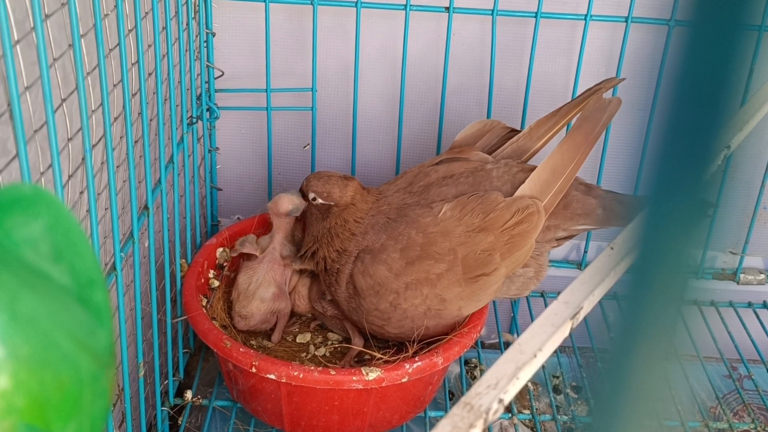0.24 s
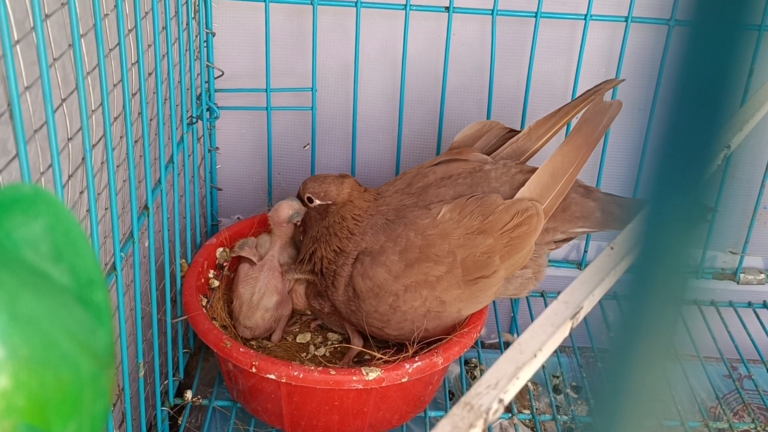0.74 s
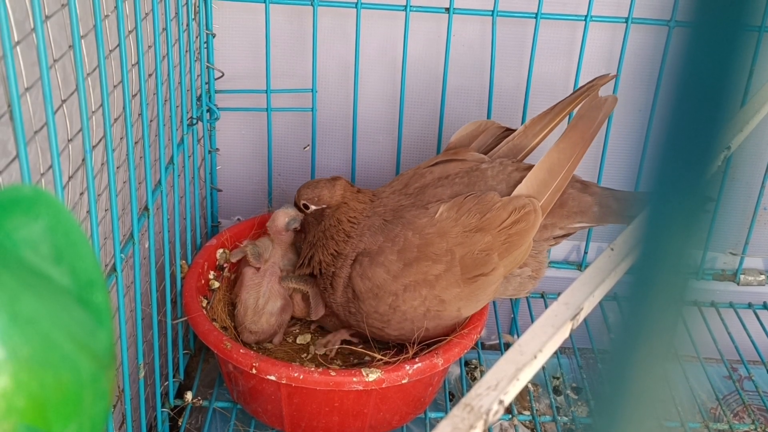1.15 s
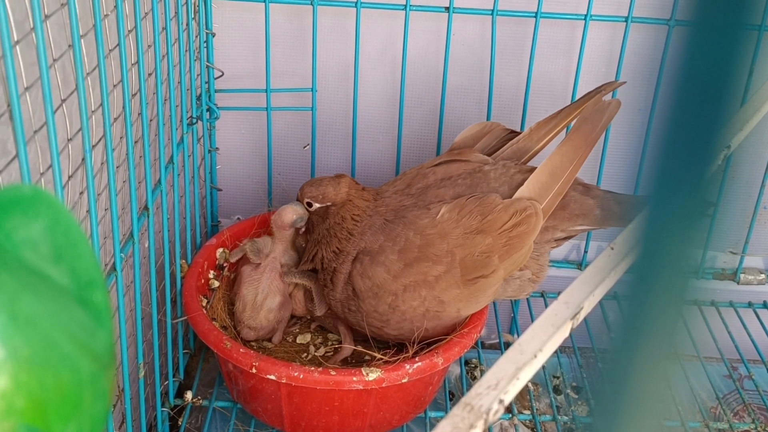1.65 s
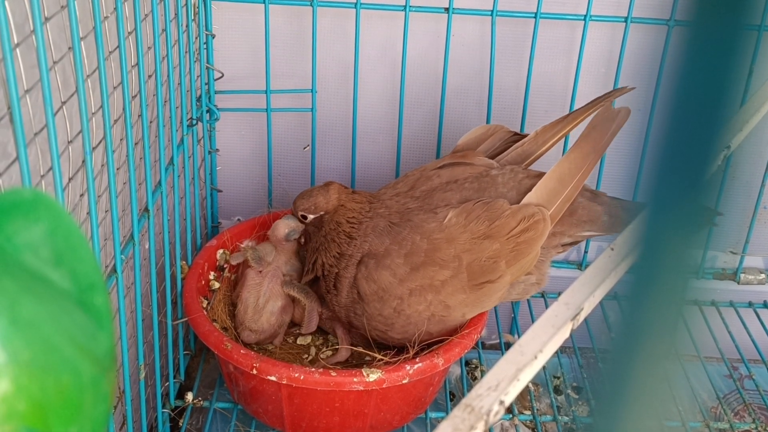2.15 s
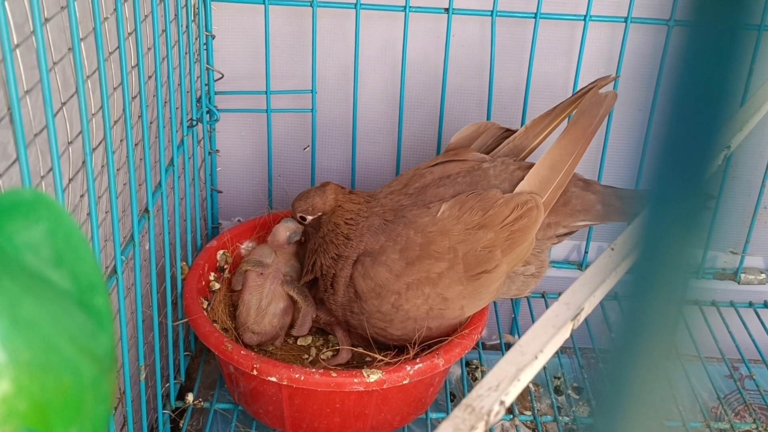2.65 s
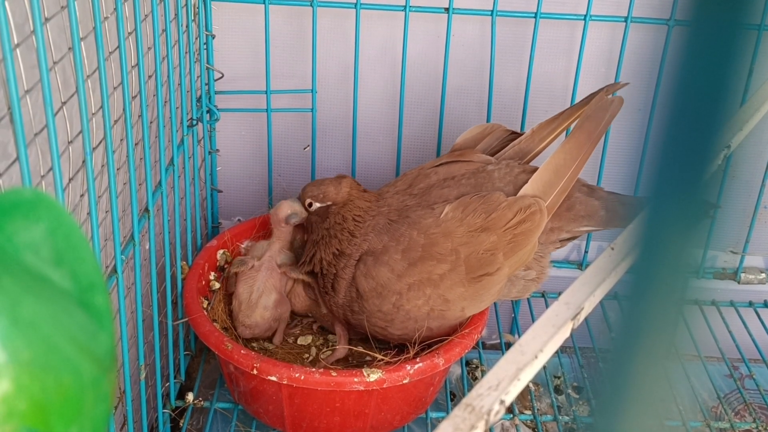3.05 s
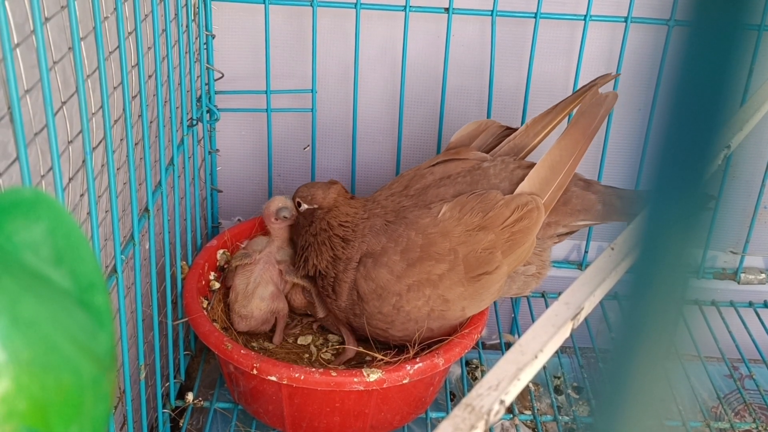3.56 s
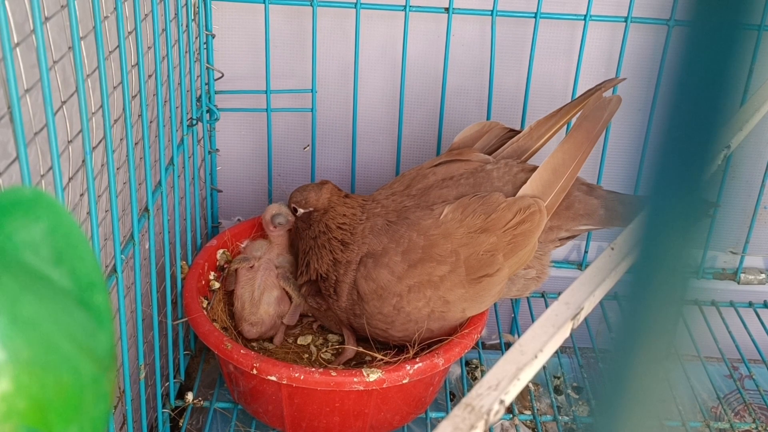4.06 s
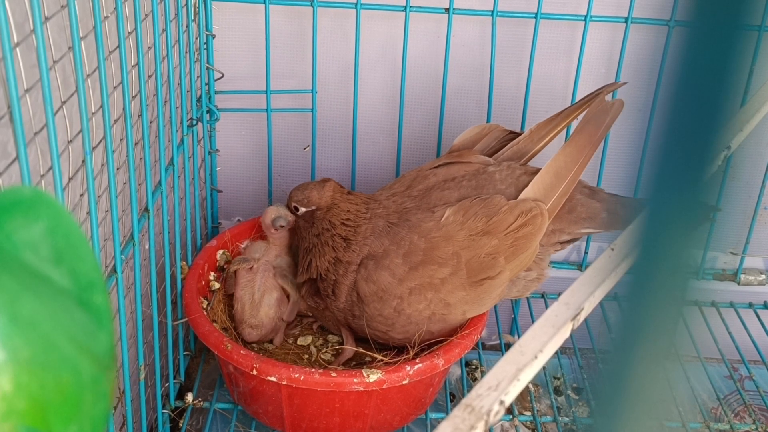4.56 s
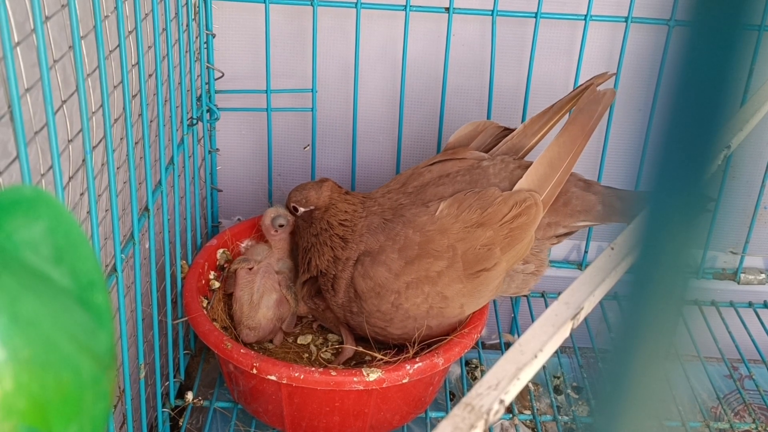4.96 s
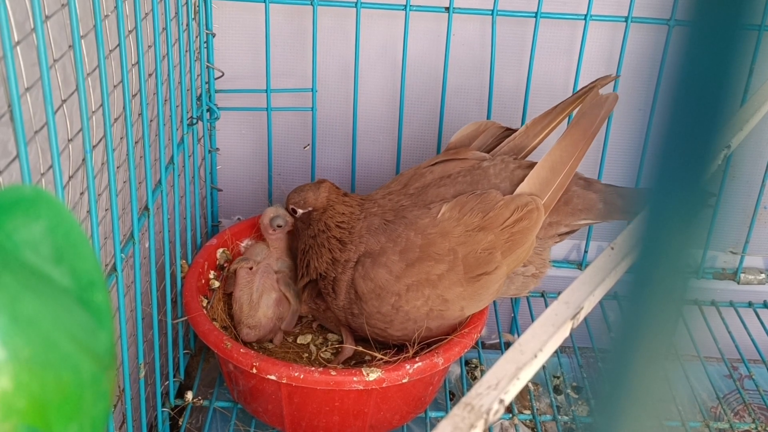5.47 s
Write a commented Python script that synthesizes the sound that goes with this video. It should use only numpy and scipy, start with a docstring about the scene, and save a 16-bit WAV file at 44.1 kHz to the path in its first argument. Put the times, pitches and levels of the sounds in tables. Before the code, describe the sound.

A fan throbs low in a small room while a baby bird peeps, squeals and rasps, then wings flurry against a plastic bowl.

```python
"""Throughout, a fan throbs in a small room: orders of its turning rate over rumble and rushing air.
Early on a young bird peeps in thin two-voiced arches (paired sine sweeps), and feathers rustle (grainy noise).
A squab being fed squeals, then squeaks (gliding tones) and rasps (noise through throat resonances) in bouts.
Faint peeps that only rise come midway, ahead of the second bout. Near the end a flurry of the parent's
wing beats pushes air, scuffs the nest and rings the plastic bowl; brushes and clicks follow."""
import sys
import numpy as np
from scipy import signal
from scipy.fft import rfft, irfft
from scipy.io import wavfile

SR = 44100
rng = np.random.default_rng(int(sys.argv[2]) if len(sys.argv) > 2 else 0)


def transcribe(u):
    """Save the signal u as a 16-bit wav file named by the first command-line argument.

    u: samples, shape (n,) or (channels, n), limited to [-1, 1]; the rate is SR.
    q: integer samples, one column per channel.
    """
    v = np.clip(np.atleast_2d(u).T, -1, 1)
    q = np.round(v * 32767).astype(np.int16)
    wavfile.write(sys.argv[1], SR, q)


N = 252252
TIME = np.arange(N) / SR

# wing beats: t/s, relative knock/dB, strongest bowl pitch f/Hz, scuff level/dB, air push level/dB
BEATS = [(4.67, -37.5, 348, -70, -63), (4.717, -24.5, 348, -38, -54), (4.792, -25, 255, -47.5, -43),
         (4.836, -24, 355, -41, -38), (4.895, -30.5, 306, -76, -38), (4.954, -27, 362, -32, -54),
         (5.044, -27, 345, -43.5, -30.5), (5.063, -23, 344, -47, -45), (5.113, -27, 356, -30.5, -23.5),
         (5.138, -11, 443, -33, -31), (5.217, -25.5, 405, -42.5, -28), (5.251, -26, 312, -46.5, -49),
         (5.303, -24.5, 430, -38.5, -28.5), (5.337, -33.5, 284, -57, -39), (5.402, -30, 350, -41, -27.5),
         (5.47, -38, 308, -45.5, -38)]


def from_db(db):
    """Amplitude gain of a level in dB."""
    return 10 ** (np.asarray(db) / 20)


def rms_one(x):
    """Scale to unit RMS."""
    return x / np.sqrt(np.mean(x ** 2) + 1e-20)


def pan(db):
    """Left and right gains for a left-minus-right difference."""
    return from_db([[db / 2], [-db / 2]])


def level(t_s, db):
    """A dB curve as a gain, -150 dB outside its span."""
    return from_db(np.interp(TIME, t_s, db, left=-150, right=-150))


def at_hz(points):
    """A spectrum table interpolated over log frequency at every FFT bin."""
    hz, value = np.transpose(points)
    bins_hz = np.arange(N // 2 + 1) * SR / N
    return np.interp(np.log(bins_hz + 1), np.log(hz), value)


def drift(rate_hz):
    """Smooth unit-RMS random curve with two knots per period of the rate."""
    knots = rng.standard_normal(N)
    return rms_one(np.interp(TIME * 2 * rate_hz, np.arange(N), knots))


def noise(spectrum):
    """Unit-RMS coloured stereo noise, alike in the bass and diffuse in the treble."""
    # left-right correlation: f/Hz, correlation/1
    likeness = [(30, 0.98), (120, 0.96), (250, 0.59), (500, 0.68), (1000, 0.029), (2500, -0.29),
                (6000, 0.13)]
    mid, side = rfft(rng.standard_normal((2, N)))
    alike = np.clip(at_hz(likeness), -1, 1)
    stereo = np.sqrt(1 + alike) * mid + np.sqrt(1 - alike) * side * [[1], [-1]]
    return rms_one(irfft(from_db(at_hz(spectrum)) * stereo, N))


def band(x, low_hz, high_hz, order=2):
    """Butterworth band-pass."""
    sos = signal.butter(order, [low_hz, min(high_hz, .45 * SR)], "band", fs=SR, output="sos")
    return signal.sosfilt(sos, x + 1e-18)


def swell(peak_s, rise_s, fall_s):
    """Bell-shaped gain; rise and fall are its 1/e half-widths."""
    out = np.zeros(N)
    on = slice(*np.searchsorted(TIME, [peak_s - 5 * rise_s, peak_s + 5 * fall_s]))
    offset = TIME[on] - peak_s
    out[on] = np.exp(-(offset / np.where(offset < 0, rise_s, fall_s)) ** 2)
    return out


def room(x, wet_db, t60_s):
    """Direct sound plus dense, dying reflections off near walls."""
    t = TIME[:SR // 2]
    echoes = rng.standard_normal((2, len(t))) * from_db(-60 * t / t60_s) * (t > .002)
    echoes /= np.sqrt(np.sum(echoes ** 2, axis=1, keepdims=True))
    wet = from_db(wet_db)
    reflected = signal.fftconvolve(np.atleast_2d(x), echoes, axes=1)[:, :N]
    return (x + wet * reflected) / np.sqrt(1 + wet ** 2)


def delay(x, lag_s):
    """Shift a signal later by a fractional number of samples."""
    return np.interp(TIME - lag_s, TIME, x, left=0)


def walls(x, lag_s):
    """A voice reaches the right ear first, then returns off the nearest walls."""
    # wall paths: left ear delay/s, right ear delay/s, level/dB
    wall_paths = [(.0031, 0.0033, -7.5), (.0074, .0066, -13.5), (0.0121, .0139, -18)]
    out = np.array([delay(x, lag_s), x])
    for left_s, right_s, db in wall_paths:
        out += from_db(db) * np.array([delay(x, left_s), delay(x, right_s)])
    return out


def ring(force, hz, t60_s):
    """Two-pole resonator: a unit click sets a decaying sine of initial height 1 ringing."""
    r, w = from_db(-60 / (t60_s * SR)), 2 * np.pi * hz / SR
    return signal.lfilter([0, np.sin(w)], [1, -2 * r * np.cos(w), r * r], force + 1e-18)


def fan():
    """Three unequal blades give a throb that repeats every turn, over rumble and rushing air."""
    # strong low orders: multiple of the turning rate/1, relative level/dB
    orders = [(3, 2.5), (4, -12.5), (6, -0.5), (8, -10), (9, -5.5), (12, -12.5), (15, -14)]
    # low noise: f/Hz, density/dB
    rumble = [(20, -29), (40, -15.5), (55, 13), (70, 5), (100, -2.5), (160, -2), (220, -10), (290, -9.5),
              (350, -17.5), (420, -28), (700, -74)]
    # rushing air: f/Hz, density/dB
    air = [(200, -3), (500, 2.5), (1000, -1.5), (2000, -4.5), (3300, -2.5), (3800, -12), (4400, -24),
           (7000, -32), (11500, -38.5), (13000, -23.5), (15000, -28.5)]
    turns_hz, crest_s = 12.828, 2.036  # orders up to 12 crest together at crest_s
    high_db, slope_db_per_octave, blade_db = -22.5, -9, 6.5
    tone_db, rumble_db, air_db = -39, -42, -60.5
    levels_db = {}
    for k in range(13, 28):
        # multiples of the blade rate stand out
        levels_db[k] = high_db + slope_db_per_octave * np.log2(k / 13) + blade_db * (k % 3 == 0)
    levels_db.update(orders)
    turn, throb = 2 * np.pi * turns_hz * (TIME - crest_s), 0
    for k, db in levels_db.items():
        scatter = rng.uniform(-np.pi, np.pi) * (k > 12)  # the room scrambles the high orders
        throb = throb + from_db(db) * np.cos(k * turn + scatter)
    low = from_db(tone_db) * throb + from_db(rumble_db) * noise(rumble)
    return pan(2.86) * low + pan(-3.5) * from_db(air_db) * noise(air)


def effort():
    """How hard the parent struggles during the wing flurry, as a gain."""
    # struggle: t/s, effort/dB
    struggle = [(4.62, -34), (4.72, -8), (4.9, -5.5), (5.06, 2.5), (5.18, -4.5), (5.42, -4), (5.55, -23.5),
                (5.72, -27.5)]
    return level(*np.transpose(struggle))


def strokes():
    """The short brush of each wing beat and the click of the claws, as a gain."""
    lag_s, rise_s, fall_s = 0.0038, 0.0096, 0.011
    claw_lag_s, claw_s, claw_db = 0.0017, 0.0028, -7  # claw level relative to the scuff
    out = np.zeros(N)
    for at_s, _, _, scuff_db, _ in BEATS:
        brush = swell(at_s + lag_s, rise_s, fall_s)
        claws = from_db(claw_db) * swell(at_s + claw_lag_s, claw_s / 2, claw_s)
        out += from_db(scuff_db) * (brush + claws)
    return out


def feathers():
    """Barbs slide over each other in fine grains; beaks and grit click among them."""
    # brushes as the birds shift: peak t/s, 1/e half-length/s, relative level/dB
    rustle = [(.02, 0.076, -70.5), (0.086, 0.014, -58), (0.51, 0.08, -68.5), (0.725, 0.034, -59.5),
              (0.777, 0.036, -61), (0.939, .022, -67), (1.09, 0.077, -69.5), (1.206, 0.039, -60.5),
              (1.655, 0.035, -74.5), (1.722, 0.033, -59), (3.076, 0.024, -63), (3.395, .025, -71),
              (3.92, 0.077, -77), (4.584, 0.03, -62), (5.64, .08, -74)]
    # beak and grit clicks: nominal t/s, relative level/dB
    ticks = [(.0752, -52), (.7204, -45), (.917, -58), (1.304, -51), (1.702, -42), (1.725, -45),
             (2.2842, -49), (3.0574, -47), (4.0504, -50), (4.4777, -42), (4.569, -50), (5.5099, -39),
             (5.6106, -44), (5.64, -36)]
    # feather noise: f/Hz, density/dB
    spectrum = [(800, -17), (2000, -4), (3200, 13.5), (4300, 0.5), (8000, -4.5), (9100, -10.5), (10300, -3),
                (11400, -8.5), (12800, 3.5), (15000, -0.5)]
    hiss_db, effort_share = -47.5, 0.51  # hiss at 0 dB effort; share of the effort's dB swing it follows
    beat_hiss_db, grain_db = -16.5, 3.5  # beat hiss relative to its scuff; spread of the grains
    wings = from_db(hiss_db) * effort() ** effort_share + from_db(beat_hiss_db) * strokes()
    brushes = sum(from_db(db) * swell(at_s, width_s, width_s) for at_s, width_s, db in rustle)
    grains = rms_one(from_db(grain_db * drift(200)))
    rubbing = (from_db(3.5) * brushes + wings) * grains
    clicks = sum(from_db(db - 14) * swell(at_s + 0.00088, 0.0014, 0.0068) for at_s, db in ticks)
    return pan(-7.5) * room(noise(spectrum) * (rubbing + clicks), wet_db=-5, t60_s=0.03)


def air_pushes():
    """Each wing beat swings the air slowly and adds a low puff of noise."""
    # puff: f/Hz, density/dB
    puff_spectrum = [(20, -19), (60, -6), (140, 11), (200, -9.5), (400, -16), (1500, -74)]
    swing_hz, puff_db = 65.2, -5
    out, puff = np.zeros((2, N)), from_db(puff_db) * noise(puff_spectrum)
    for at_s, *_, push_db in BEATS:
        swing = np.sin(2 * np.pi * swing_hz * (TIME - at_s))
        out += from_db(push_db) * swell(at_s + 0.0043, 0.013, 0.029) * (swing + puff)
    return out


def nest_bowl(vigour):
    """Wing knocks ring the bowl's modes, which also drone under the scraping."""
    # bowl modes: f/Hz, relative level/dB, t60/s
    modes = [(259.5, -8.5, 0.13), (312, -2.5, 0.091), (347.6, -1.5, 0.069), (370.7, -9.5, 0.099),
             (440, -7, 0.075), (576, 0, 0.031), (696, -12, 0.067), (925, -20, 0.065)]
    scrape_db, scrape_swing_db = -59.5, 2.6  # scraping at 0 dB effort; its random spread
    spread_db, focus_db_per_octave = 3.5, 26  # random spread per ear and mode; loss away from the pitch
    scraping, out = from_db(scrape_db + scrape_swing_db * drift(14)) * vigour, 0
    for hz, db, t60_s in modes:
        force = scraping * (rng.standard_normal(N) + .5 * rng.standard_normal((2, N)))
        for at_s, knock_db, pitch_hz, *_ in BEATS:
            # where the wing lands decides which modes ring most
            off_pitch_db = focus_db_per_octave * abs(np.log2(hz / pitch_hz))
            force[:, round(at_s * SR)] += from_db(knock_db + 4 + rng.normal(0, spread_db, 2) - off_pitch_db)
        # a feathered blow is soft: the ringing builds over a few milliseconds
        out = out + from_db(db) * (ring(force, hz, t60_s) - ring(force, hz, 0.026))
    return out


def flurry():
    """Each wing beat pushes air, scuffs the nest and knocks the bowl."""
    # nest scuffing: f/Hz, density/dB
    spectrum = [(290, -30), (500, -3), (614, -5.5), (685, -4), (792, -6), (996, -3), (1190, -11),
                (1600, -10.5), (1980, -7), (2350, -12), (2890, -5.5), (4300, -20), (9000, -39),
                (11700, -65), (19800, -120)]
    scuff_db, grain_db = -42, 3  # scuffing at 0 dB effort; spread of the grains
    vigour = effort()
    scuff = from_db(scuff_db) * vigour + strokes()
    scuffing = noise(spectrum) * scuff * rms_one(from_db(grain_db * drift(160)))
    nest = from_db(1) * pan(-2.7) * room(scuffing, wet_db=-5, t60_s=0.21)
    return nest + from_db(5.5) * nest_bowl(vigour) + air_pushes()


def whistles(notes, jitter, flutter_db, second_db, third_db, hoarse_db):
    """Nearly pure membrane tones that wobble more when slack, with ragged overtones and a hoarse fringe."""
    out, wobble, flutter = np.zeros(N), drift(330), from_db(flutter_db * drift(120))
    ragged, fringe = drift(770), drift(900)
    for note in notes:
        t_s, hz, db = np.transpose(note)
        on = (TIME > t_s[0]) & (TIME < t_s[-1])
        pitch_hz = np.interp(TIME[on], t_s, hz)
        slack = np.clip((3300 / pitch_hz) ** 3, 1, 2.6)
        phase = 2 * np.pi * np.cumsum(pitch_hz * (1 + jitter * slack * wobble[on])) / SR
        overtones = from_db(second_db) * np.sin(2 * phase) + from_db(third_db) * np.sin(3 * phase)
        hoarse = from_db(hoarse_db) * fringe[on] * np.cos(phase)
        tone = np.sin(phase) + ragged[on] * overtones + hoarse
        edges = signal.windows.tukey(len(pitch_hz), .12)
        out[on] += np.sqrt(2) * tone * level(t_s, db)[on] * flutter[on] * edges
    return out


def glide(start_s, length_s, start_hz, middle_hz, end_hz, peak_db, peak_at):
    """One note as (s, Hz, dB) points: the pitch bends along a parabola, the level swells and fades."""
    edge_db = 10.5  # start and end lie this far under the peak
    u = np.linspace(0, 1, 20)
    hz = np.polyval(np.polyfit([0, .5, 1], [start_hz, middle_hz, end_hz], 2), u)
    fade = np.interp(u, [0, np.clip(peak_at, 0, 1), 1], [1, 0, 1])
    return np.transpose([start_s + length_s * u, hz, peak_db - edge_db * fade])


def thin_peeps():
    """Faint whistled notes that only rise, all at the same rate."""
    # thin peeps: start t/s, length/s, start f/Hz, relative peak level/dB
    rising = [(2.168, .03, 4020, -70), (2.4, 0.071, 4340, -83.5), (2.951, 0.025, 4530, -66)]
    rise_octaves_per_s = 11
    notes = []
    for start_s, length_s, hz, db in rising:
        pitches_hz = hz * 2 ** (rise_octaves_per_s * length_s * np.array([0, .5, 1]))
        notes.append(glide(start_s, length_s, *pitches_hz, db, .5))
    return whistles(notes, jitter=.006, flutter_db=3, second_db=-13.5, third_db=-30, hoarse_db=-28)


def peeps():
    """Both sides of the syrinx sweep up and down together, each to its own top pitch."""
    # arches: apex t/s, rise/s, upper top f/Hz, lower top f/Hz, relative level/dB, lower re upper voice/dB
    arches = [(0.155, .051, 5320, 4940, -61.5, 7.5), (1.239, 0.038, 5400, 4370, -56.5, 7.5),
              (1.506, .042, 5050, 4606, -55, 6.5), (1.764, 0.041, 5020, 4134, -50, 2.5),
              (2.754, 0.048, 5270, 5000, -58.5, 6.5), (3.146, 0.031, 5130, 4960, -52, -16),
              (3.4, 0.062, 5420, 4630, -53, 5), (4.258, 0.064, 5330, 4850, -64.5, -1.5)]
    start_hz, split, fall_s = 3300, 1.07, 0.022  # lower voice's end pitch; upper voice's ratio to it
    jitter, flutter_db, overtone_db = .007, 1.2, -38
    out, wobbles = thin_peeps(), [drift(300), drift(280)]
    for apex_s, rise_s, upper_hz, lower_hz, db, lower_db in arches:
        on = (TIME > apex_s - rise_s) & (TIME < apex_s + fall_s)
        offset = TIME[on] - apex_s
        arch = np.cos(offset / np.where(offset < 0, rise_s, fall_s) * np.pi / 2)
        voices = [(start_hz * split, upper_hz, db), (start_hz, lower_hz, db + lower_db)]
        for (low_hz, top_hz, voice_db), wobble in zip(voices, wobbles):
            pitch_hz = (low_hz + (top_hz - low_hz) * arch ** 1.4) * (1 + jitter * wobble[on])
            phase = 2 * np.pi * np.cumsum(pitch_hz) / SR
            tone = np.sin(phase) + from_db(overtone_db) * (np.sin(2 * phase) + np.sin(3 * phase))
            out[on] += from_db(voice_db) * np.minimum(1, 2 * arch) * tone
    return pan(-4.5) * room(out * from_db(flutter_db * drift(110)), wet_db=1.5, t60_s=0.08)


def rasps():
    """Rough spurts of air excite the squab's throat; the beak opening favours resonances near one pitch."""
    # spurts: peak t/s, nominal half-length/s, relative level/dB, centre f/Hz, relative treble/dB
    spurts = [(0.467, 0.014, -42.5, 2780, -5), (0.561, 0.047, -48.5, 2890, -14),
              (0.632, 0.021, -31, 3560, 1.5), (3.077, 0.031, -55, 2975, 3), (3.177, .015, -55, 2080, -22),
              (3.726, 0.017, -46.5, 1500, -5.5), (3.82, .021, -60, 2660, -21),
              (3.905, 0.026, -49.5, 1900, -31), (4.075, 0.021, -42, 2340, 1.5),
              (4.291, 0.024, -44, 2440, -10), (5.237, 0.021, -27.5, 3400, 7)]
    # throat and open beak resonances: f/Hz, width/Hz, relative level/dB
    throat_modes = [(800, 370, 0), (1396, 130, -9), (1976, 390, 3.5), (2730, 300, 4), (3240, 340, 7),
                    (3845, 210, 0.5), (5010, 64, -3), (5600, 850, -24)]
    # treble hiss: f/Hz, density/dB
    treble_spectrum = [(1200, -42), (3000, -0.5), (5000, 3), (6500, -6.5), (8200, -5.5), (9100, -20),
                       (10400, -14.5), (11500, -22), (13000, -12.5), (15500, -20)]
    grain_db, treble_db, focus_db_per_octave = 1, -13, 14
    skew = 0.93  # the rise is shorter than the half-length, the fall longer, by this factor
    out, white, hiss = np.zeros((2, N)), rng.standard_normal((2, N)), noise(treble_spectrum)
    modes = []
    for hz, width_hz, db in throat_modes:
        modes.append((hz, from_db(db) * rms_one(band(white, hz - width_hz / 2, hz + width_hz / 2))))
    for peak_s, half_s, db, centre_hz, bright_db in spurts:
        on = np.abs(TIME - peak_s) < .15
        throat = 0
        for hz, mode in modes:
            off_centre_db = focus_db_per_octave * abs(np.log2(hz / centre_hz))
            throat = throat + mode[:, on] * from_db(-off_centre_db)
        spurt = rms_one(throat) + from_db(treble_db + bright_db) * hiss[:, on]
        out[:, on] += spurt * from_db(db) * swell(peak_s, half_s * skew, half_s / skew)[on]
    grains = from_db(grain_db * drift(200))
    return from_db(2.5) * pan(-4) * room(out * grains, wet_db=-11, t60_s=0.16)


def squeaks():
    """The squab's sliding begging notes: one loud falling squeal and softer bent glides."""
    # loud squeal: t/s, f/Hz, relative level/dB
    squeal = [(.472, 3120, -31), (.482, 3282, -15.5), (.497, 3270, -18.5), (.51, 3240, -16),
              (.524, 2940, -21.5), (.54, 2464, -27.5), (.558, 1983, -35.5), (.57, 1690, -56.5),
              (.582, 1290, -43.5)]
    # soft glides: start t/s, length/s, start f/Hz, middle f/Hz, end f/Hz, relative peak level/dB, peak place/1
    glides = [(.448, 0.026, 2720, 2642, 2310, -31, 0.52), (.445, 0.036, 5500, 4900, 3900, -41, 0.66),
              (3.033, 0.027, 2400, 2050, 1930, -45.5, 0.74), (3.035, 0.068, 4640, 3455, 3280, -44.5, 0.8),
              (3.075, 0.023, 2670, 2165, 1970, -43.5, 0.66), (3.051, .034, 7550, 6900, 6750, -56, 0.54),
              (3.101, .06, 2710, 2493, 2130, -43.5, 0.07), (3.153, 0.0288, 2180, 1885, 1630, -43, 0.33),
              (3.789, .035, 2000, 2020, 1950, -52, .45), (3.81, 0.076, 1290, 1730, 1740, -54.5, 0.2),
              (3.998, 0.053, 1707, 1695, 2310, -45.5, 0.46), (4.153, 0.11, 1924, 2540, 1820, -52, 0.43),
              (4.386, 0.032, 1940, 2025, 1940, -50, 0.82), (4.418, .06, 2355, 2895, 1830, -50.5, 0.1),
              (4.382, .028, 4080, 4030, 4330, -61, 0.3), (4.487, 0.08, 2730, 2256, 1850, -49.5, 0.27),
              (4.859, 0.035, 1794, 1856, 1680, -39, 0.6), (4.904, 0.049, 1742, 1693, 1580, -39.5, 0.1),
              (4.951, 0.0665, 2390, 2650, 2510, -38.5, 0.55), (5.004, 0.046, 2157, 1924, 1710, -34.5, 0.23)]
    jitter = .01  # relative pitch wobble of a taut membrane
    loud = whistles([squeal], jitter, flutter_db=0.5, second_db=-36.5, third_db=-58, hoarse_db=-29.5)
    notes = [glide(*row) for row in glides]
    soft = whistles(notes, jitter, flutter_db=3, second_db=-26, third_db=-45.5, hoarse_db=-17)
    voice = walls(loud + soft, lag_s=0.00012)
    return from_db(1) * pan(-4.5) * room(voice, wet_db=-4, t60_s=0.096)


def scene():
    """Sum of all sources, background first."""
    return fan() + feathers() + flurry() + peeps() + rasps() + squeaks()


def record(dry):
    """A steep elliptic low-pass cuts the top."""
    cutoff_hz = 15400
    return signal.sosfilt(signal.ellip(10, .2, 80, cutoff_hz, fs=SR, output="sos"), dry)


dry = scene()
out = record(dry)
transcribe(out)
```